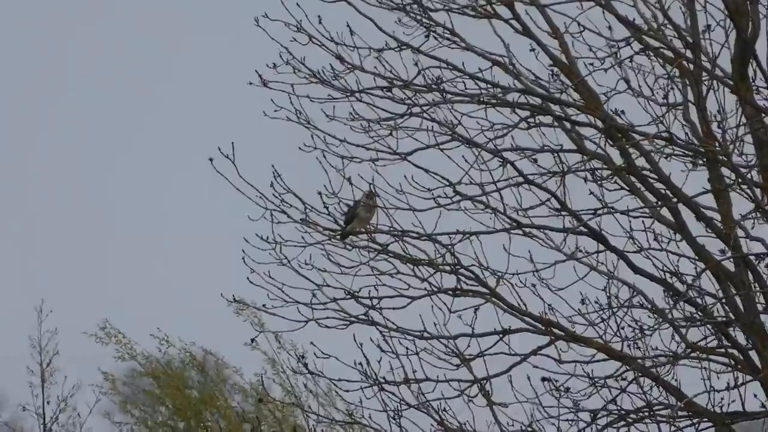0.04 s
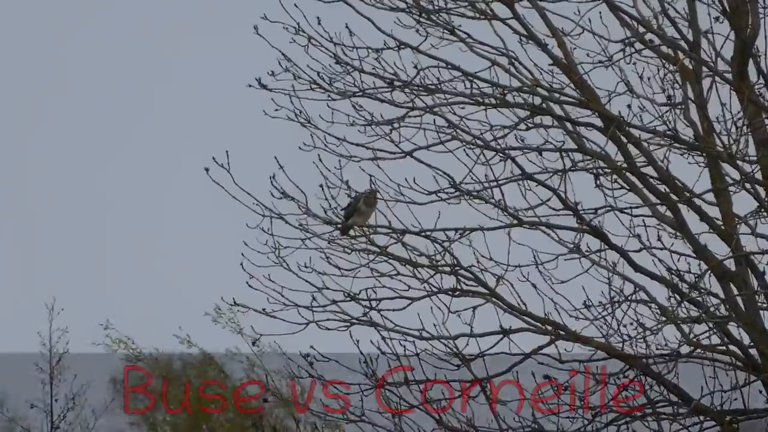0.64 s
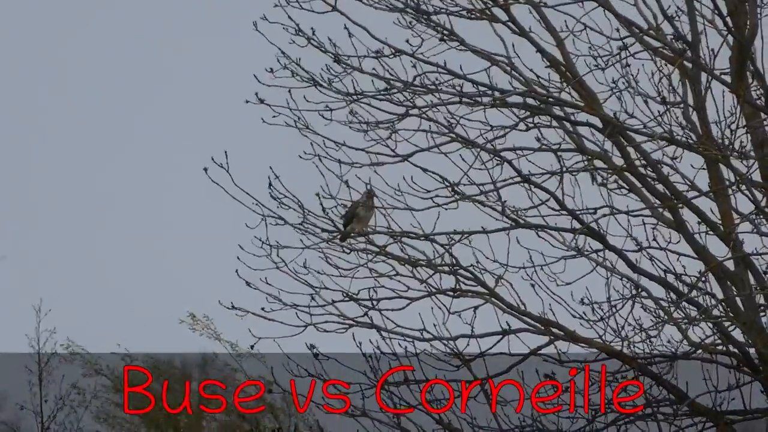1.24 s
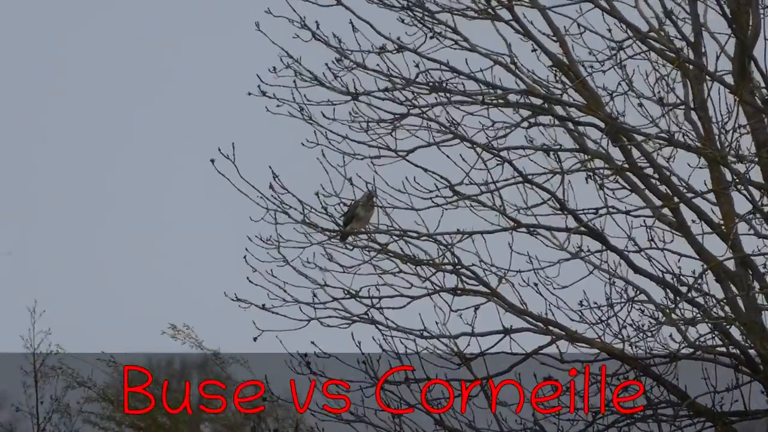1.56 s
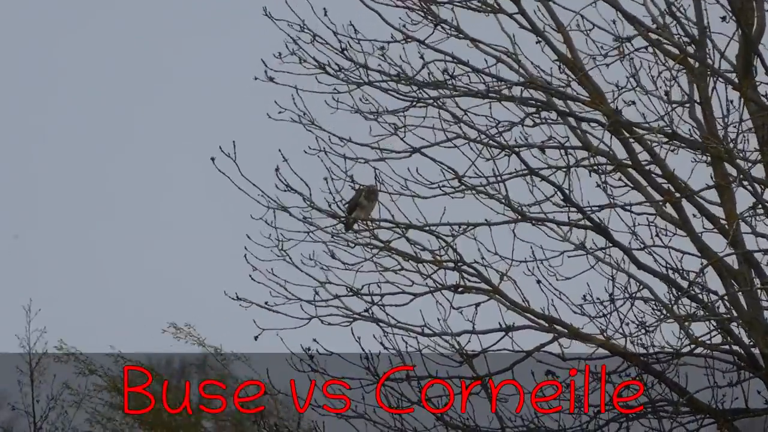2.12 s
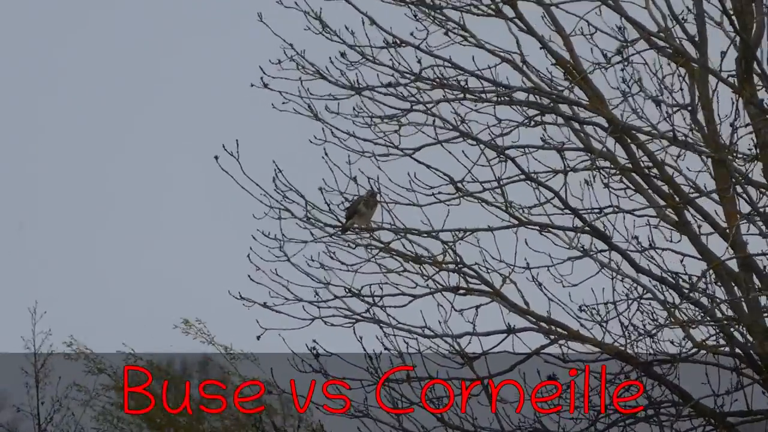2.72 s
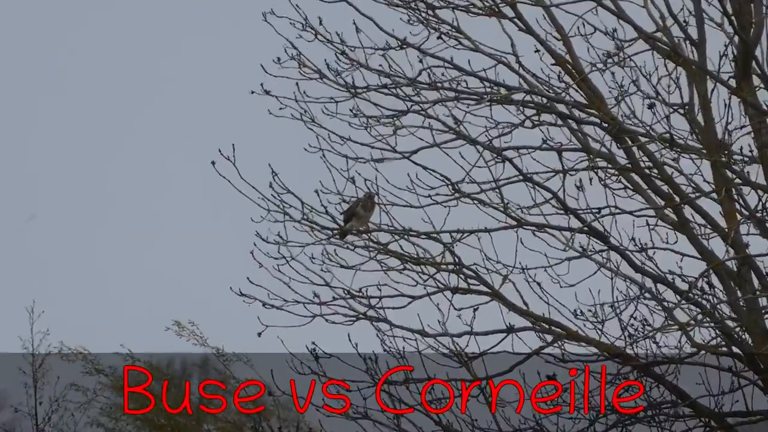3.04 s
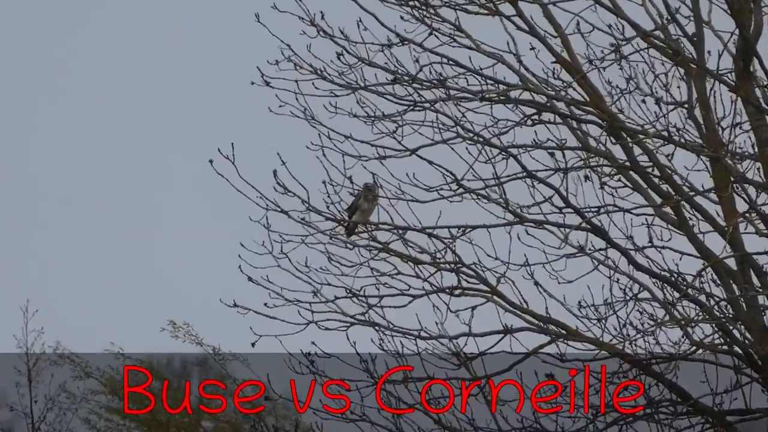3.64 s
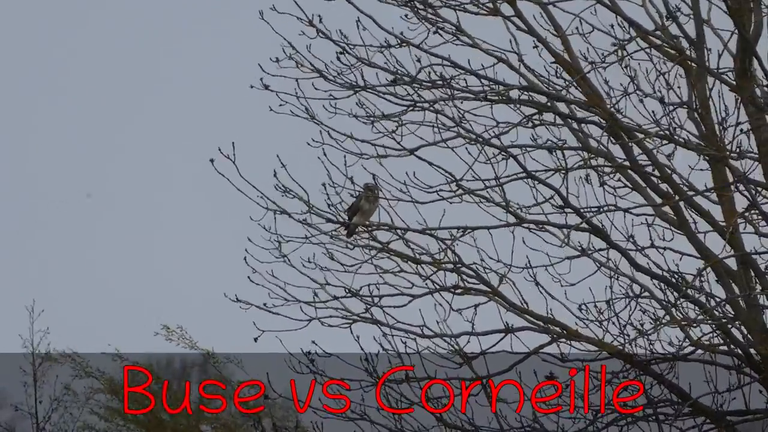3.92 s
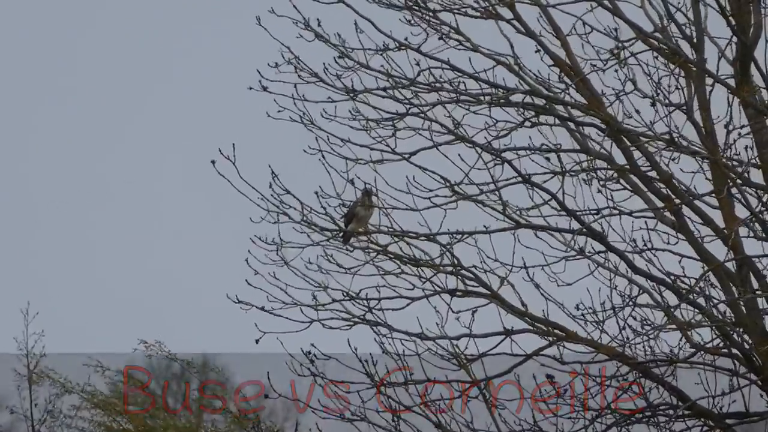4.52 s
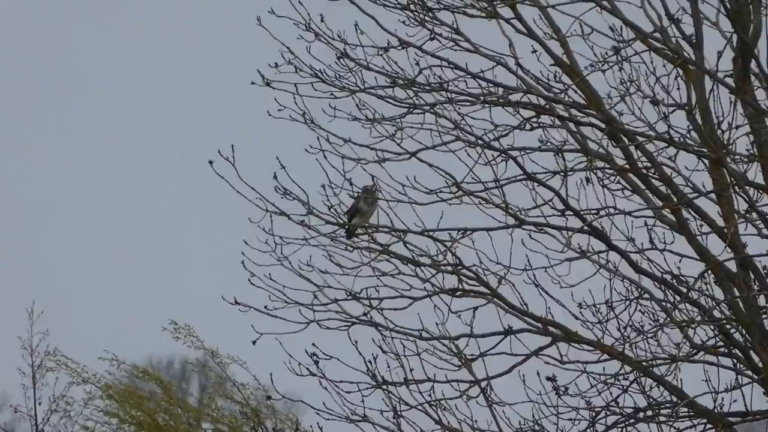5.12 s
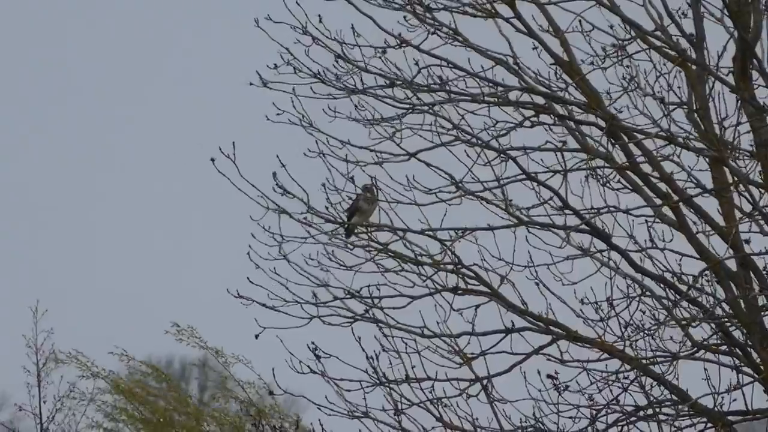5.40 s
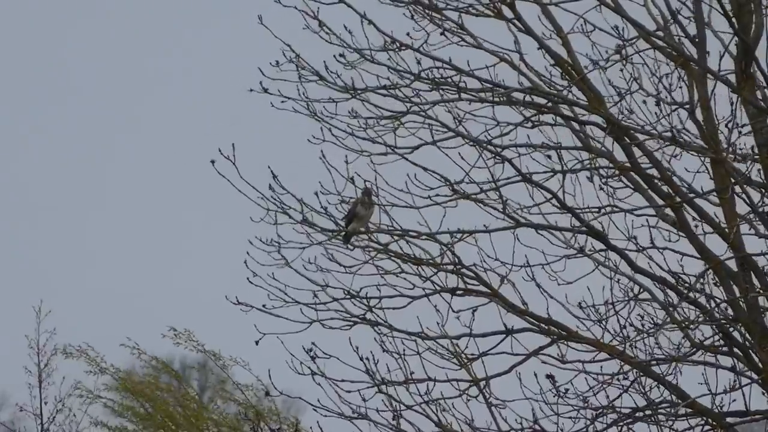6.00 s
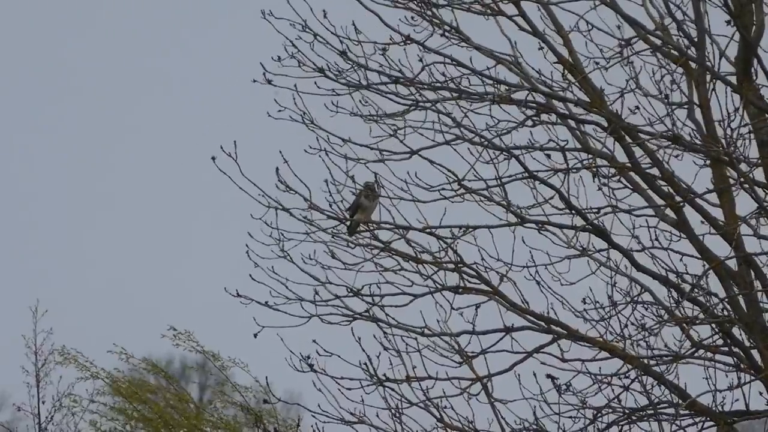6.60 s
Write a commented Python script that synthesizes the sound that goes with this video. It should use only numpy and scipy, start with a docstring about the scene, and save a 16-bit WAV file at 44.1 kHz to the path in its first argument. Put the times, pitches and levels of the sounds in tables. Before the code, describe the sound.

Outdoors among bare trees, uneven gusts rumble on the microphone over a steady rush of air, softly rustling branches and recorder hiss. Small birds chirp and scold faintly far off, mostly early on, with two faint whistles and a few light twig knocks. The wind eases after about four seconds, and near the end one bird pipes a thin, fading note. Nearly everything is on the left.

```python
"""A breezy day among bare trees. After a moment of silence, turbulent gusts rumble on the microphone over
the rush of open air, rustling branches and electronic hiss. In the first two seconds small birds chirp
and scold far off, a twig ticks and two faint whistles carry over. Scattered chirps and twig knocks follow;
after four seconds the wind eases, and near six one bird pipes a thin, fading note. Throughout, nearly
all of it reaches the left channel; the right holds little but the recorder's own hiss."""
import sys
import numpy as np
from scipy import signal
from scipy.fft import rfft, irfft
from scipy.io import wavfile
from scipy.ndimage import uniform_filter1d

SR = 44100
rng = np.random.default_rng(int(sys.argv[2]) if len(sys.argv) > 2 else 0)


def bounce(signal):
    """Save signal as a 16-bit WAV file at the path given by the first command-line argument."""
    frames = np.transpose(np.atleast_2d(signal))
    limited = np.clip(frames, -1, 1)
    pcm = np.round(limited * 32767).astype(np.int16)
    wavfile.write(sys.argv[1], SR, pcm)


N = 302526
TIME = np.arange(N) / SR
HZ = np.fft.rfftfreq(N, 1 / SR)

# All levels are relative, ahead of the layer and channel gains.
# Spectrum of turbulence at the microphone: (frequency [Hz], level [dB])
RUMBLE_SPECTRUM = [(5, -13), (15, -8), (31, 1), (48, -2.5), (70, -8), (100, -16.5), (160, -26), (300, -38),
                   (900, -62)]
# Wind strength at the microphone: (time [s], level [dB])
WIND_LEVELS = [(0.28, -32.5), (0.6, -33), (1.05, -34.5), (1.35, -42), (1.7, -34.5), (2.25, -38.5),
               (2.55, -35.5), (2.95, -41.5), (3.7, -39.5), (4.35, -47.5), (4.85, -49.5), (5.1, -45),
               (5.7, -50.0), (5.95, -45), (6.2, -52), (6.6, -44), (6.86, -48.0)]
# Single buffets above that wind: (peak time [s], level [dB])
BUFFET_PEAKS = [(0.35, -32.5), (0.44, -27), (0.86, -33), (1.18, -31.5), (1.56, -34), (1.89, -34.5),
                (2.49, -27.5), (2.8, -32.5), (3.17, -38), (3.75, -37), (3.81, -32.5), (3.94, -34),
                (4.19, -39.5)]
# Breeze over the land: (time [s], rush level [dB], rustle level [dB])
BREEZE_LEVELS = [(0.56, -49.5, -59.5), (1.4, -49.5, -61), (2.06, -50, -60.5), (2.61, -49.5, -58),
                 (4.25, -50, -59.5), (6.42, -51.5, -58.5), (6.8, -51.5, -59)]
# Spectrum of the far rush: (frequency [Hz], level [dB])
RUSH_SPECTRUM = [(20, 5), (55, -3.5), (90, 5), (125, 2), (200, 0.5), (260, -1), (340, 0.15), (550, -4),
                 (850, -5.5), (1080, -6), (1500, -10.5), (2300, -16.5), (4000, -26.5), (9000, -34)]
# Broad tones in that rush: (frequency [Hz], width [Hz], lift [dB])
DRONE_PEAKS = [(92.5, 22, 4.5), (149.8, 21, 3.5), (461, 25, 4), (672, 52, 2)]
# Spectrum of the branches' rustle: (frequency [Hz], level [dB])
RUSTLE_SPECTRUM = [(400, -9), (1500, 1.5), (2600, 1.5), (3800, 0.5), (4900, -3), (5700, -7), (7500, -11),
                   (11000, -11), (16000, -8)]
# Electronic hiss: (frequency [Hz], left level [dB], right level [dB], correlation [ratio])
HISS_SPECTRUM = [(20, -10, 4, 0), (150, -10, 1, 0), (450, 2, 1, 0), (1030, 13.5, -3, 0),
                 (2200, -19, -5.5, 0.14), (4820, 7, -4, 0.036), (7500, 2, -2, 0.28), (10000, 0.5, 0, 0.4),
                 (14300, 2, 3.5, 0.76)]
# Bird chirps: (time [s], length [s], start pitch [Hz], end pitch [Hz], arch [Hz], level [dB])
CHIRP_NOTES = [(.345, .028, 3400, 3300, 0, -62), (.615, .035, 3320, 3200, 0, -63),
               (.668, .014, 3750, 3600, 0, -59), (.826, 0.049, 4210, 4700, 318, -56.5),
               (.876, 0.028, 5000, 5100, -600, -54.5), (1.062, .014, 4440, 5250, 0, -52.5),
               (1.069, .013, 4450, 3950, 0, -59), (1.12, .045, 5800, 5450, -120, -65.5),
               (1.314, .044, 3910, 5470, 150, -54.5), (1.598, .016, 5900, 4200, 250, -58),
               (1.649, .014, 5400, 4600, 0, -58), (2.166, .018, 4000, 3650, 0, -58),
               (2.324, .03, 3880, 3670, -70, -59), (3.276, .018, 5500, 4950, 0, -60),
               (5.832, .022, 3500, 3470, 0, -61), (6.28, .045, 2860, 2800, 0, -63),
               (6.617, 0.019, 3360, 3530, 480, -54)]
# Twig impacts: (time [s], peak level [dB], band centre [Hz], width [octaves])
TWIG_TICKS = [(.405, -46.5, 3600, .4), (2.520, -38, 1500, 0.62), (2.535, -43, 1400, .65),
              (2.537, -42, 2780, 0.2), (2.737, -46, 3600, 0.46), (3.808, -47, 5550, 0.24),
              (3.997, -50, 6500, .18), (4.152, -49, 3300, 0.38), (6.603, -50, 6500, .4)]
# Far whistles: (time [s], length [s], start pitch [Hz], end pitch [Hz], arch [Hz], level [dB])
WHISTLE_NOTES = [(.42, 0.12, 684, 676, 14.2, -57.5), (1.26, 0.272, 1160, 1208, 15.6, -61)]
# Toneless bird calls: (time [s], length [s], band centre [Hz], width [octaves], level [dB])
RASP_CALLS = [(0.494, .03, 4800, .1, -59), (.675, .05, 2380, 0.21, -59), (.748, 0.034, 2660, .15, -59),
              (.872, .03, 4700, .06, -58), (1.194, .025, 4570, .1, -59), (1.383, .025, 3900, .08, -59.5)]


def gain_of(db):
    """Amplitude grows tenfold for every 20 decibels."""
    return 10 ** (np.asarray(db) / 20)


def unit_rms(x):
    """Normalisation brings a signal's mean power to one."""
    return x / np.sqrt(np.mean(x ** 2) + 1e-20)


def spectrum(points, column=1):
    """Interpolation in log frequency joins a table column into a spectrum."""
    table = np.array(points, float)
    return np.interp(np.log(HZ + 1), np.log(table[:, 0] + 1), table[:, column])


def curve(rows, column=1):
    """Interpolation in time joins a table column into an envelope."""
    table = np.array(rows, float)
    return np.interp(TIME, table[:, 0], table[:, column])


def noise(colour_db):
    """Filtered white noise takes on the filter's spectrum; rms one."""
    return unit_rms(irfft(rfft(rng.standard_normal(N)) * gain_of(colour_db), N))


def band_noise(centre_hz, octaves, size=4096):
    """Band-pass filtering confines a short noise to one bell-shaped band; rms one."""
    hz = np.fft.rfftfreq(size, 1 / SR)
    band = np.exp(-.5 * (np.log2((hz + 1) / centre_hz) / octaves) ** 2)
    return unit_rms(irfft(rfft(rng.standard_normal(size)) * band))


def patchy(x, depth_db, bins, frames):
    """Eddies modulate a sound's amplitude in patches of frequency and time."""
    spectra = signal.stft(x, nperseg=512, noverlap=384)[2]
    field = uniform_filter1d(rng.standard_normal(spectra.shape), bins, axis=0)
    field = unit_rms(uniform_filter1d(field, frames, axis=1))
    return unit_rms(signal.istft(spectra * gain_of(depth_db * field), nperseg=512, noverlap=384)[1][:N])


def add(mix, start_s, sound):
    """Superposition: a sound sums into the mix from its starting time."""
    part = mix[round(start_s * SR):][:len(sound)]
    part += sound[:len(part)]


def buffeting(buffet_s=0.026, flutter_db=1.9, flutter_s=0.044):
    """Turbulent pressure on the microphone makes a rumble whose power sums wind and single buffets."""
    eddies = noise(spectrum(RUMBLE_SPECTRUM))
    eddy_envelope = np.sqrt(uniform_filter1d(eddies ** 2, size=4500) + 1e-6)
    flutter = noise(-40 * np.log10(1 + (HZ * flutter_s) ** 2))
    power = gain_of(curve(WIND_LEVELS) + flutter_db * flutter) ** 2
    for peak_s, db in BUFFET_PEAKS:
        power += gain_of(db) ** 2 * np.exp(-((TIME - peak_s) / buffet_s) ** 2)
    return eddies / eddy_envelope * np.sqrt(power) * gain_of(-1.0)


def open_air():
    """Far wind is broadband noise; low peaks in its spectrum are heard as a faint drone."""
    drone_db = sum(db / (1 + (2 * (HZ - hz) / width) ** 2) for hz, width, db in DRONE_PEAKS)
    rush = patchy(noise(spectrum(RUSH_SPECTRUM) + drone_db), depth_db=0.55, bins=5, frames=40)
    return rush * gain_of(curve(BREEZE_LEVELS) + 2.5)


def branches():
    """Flow noise: air combing through twigs and leaves makes a soft, uneven hiss."""
    rustle = patchy(noise(spectrum(RUSTLE_SPECTRUM)), depth_db=2.0, bins=7, frames=10)
    return rustle * gain_of(curve(BREEZE_LEVELS, column=2) + 2.0)


def hiss(level_db=-56.5):
    """Electronic noise, partly correlated between the channels in the treble."""
    shared, separate = rfft(rng.standard_normal((2, N)))
    correlation = np.clip(spectrum(HISS_SPECTRUM, column=3), -1, 1)
    left = shared * gain_of(spectrum(HISS_SPECTRUM, column=1))
    right = correlation * shared + np.sqrt(1 - correlation ** 2) * separate
    right *= gain_of(spectrum(HISS_SPECTRUM, column=2))
    return gain_of(level_db) * unit_rms(irfft(np.array([left, right]), N))


def sing(hz, waver):
    """Random frequency modulation makes a sine of rms one waver about its pitch curve."""
    drift = unit_rms(uniform_filter1d(rng.standard_normal(SR), size=90))[:len(hz)]
    return np.sqrt(2) * np.sin(2 * np.pi * np.cumsum(hz * (1 + waver * drift)) / SR)


def notes(rows, waver):
    """Chirps and whistles are frequency sweeps: each arches about a straight glide, swells and fades."""
    out = np.zeros(N)
    for start_s, length_s, start_hz, end_hz, arch_hz, db in rows:
        progress = np.linspace(0, 1, int(length_s * SR))
        hz = start_hz + (end_hz - start_hz) * progress + arch_hz * (1 - (2 * progress - 1) ** 2)
        add(out, start_s, gain_of(db) * sing(hz, waver) * signal.windows.tukey(len(hz), .7))
    return out


def twitter(per_s=3, length_s=0.028, centre_hz=3700, spread_octaves=0.247, fall=.05, db=-66.5):
    """Farther birds form a random process: faint falling notes at chance times and pitches."""
    draws = rng.random((round(per_s * N / SR), 2))
    times = draws[:, 0] * N / SR
    pitches = centre_hz * 2 ** (spread_octaves * (2 * draws[:, 1] - 1))
    rows = [(s, length_s, hz, hz * (1 - fall), 0, db) for s, hz in zip(times, pitches)]
    return notes(rows, waver=.01)


def twigs(rise_s=0.00061, decay_s=0.0051):
    """Damped impacts: twigs knock together, each a burst of band noise that decays exponentially."""
    out = np.zeros(N)
    for start_s, db, centre_hz, octaves in TWIG_TICKS:
        burst = band_noise(centre_hz, octaves)
        t = TIME[:len(burst)]
        burst = burst * (1 - np.exp(-t / rise_s)) * np.exp(-t / decay_s)
        add(out, start_s, gain_of(db) * burst / abs(burst).max())
    return out


def whistles():
    """Two distant whistles are nearly pure tones with a slow, shallow glide."""
    return notes(WHISTLE_NOTES, waver=0.013)


def rasps():
    """Scolding calls are aperiodic: brief swells of narrow-band noise."""
    out = np.zeros(N)
    for start_s, length_s, centre_hz, octaves, db in RASP_CALLS:
        call = band_noise(centre_hz, octaves)[:int(length_s * SR)]
        add(out, start_s, gain_of(db) * unit_rms(call) * signal.windows.tukey(len(call), .7))
    return out


def piping(start_s=6.098, length_s=.2, pitch_hz=4155, db=-54.5):
    """A bird's thin tone scoops up to a held pitch while its amplitude decays exponentially."""
    scoop_hz, scoop_s, rise_s, fade_db_per_s = 450, .008, 0.017, 73
    t = TIME[:int(length_s * SR)]
    tone = sing(pitch_hz - scoop_hz * np.exp(-t / scoop_s), waver=0.0033)
    envelope = np.minimum(t / rise_s, 1) * gain_of(db - fade_db_per_s * t)
    out = np.zeros(N)
    add(out, start_s, tone * envelope)
    return out


def among_trees(x, wet_db, t60_s, echoes_per_s=2000):
    """Scattering from trunks and branches leaves a thin reverberant tail after each sound."""
    t = TIME[:SR]
    echoes = rng.standard_normal(SR) * (rng.random(SR) < echoes_per_s / SR)
    tail = echoes * gain_of(-60 * t / t60_s) * (t > .008)
    return x + gain_of(wet_db) * signal.fftconvolve(x, tail / np.linalg.norm(tail))[:N]


def scene():
    """The sources superpose at one microphone, which feeds the left channel and leaks into the right."""
    calls = notes(CHIRP_NOTES, waver=0.013) + twitter() + piping() + rasps()
    birds = among_trees(calls, wet_db=-8.5, t60_s=0.2)
    far_whistles = among_trees(whistles(), wet_db=-3, t60_s=0.83)
    knocks = among_trees(twigs(), wet_db=-5.0, t60_s=0.6)
    outdoors = buffeting() + open_air() + branches() + birds + far_whistles + knocks
    left_db, right_db = 6.0, -35.0
    return np.array([gain_of(left_db) * outdoors, gain_of(right_db) * outdoors])


def record(dry):
    """Noise and filtering: the recorder adds hiss, cuts a notch, switches on and limits the band."""
    notch_hz, notch_width_hz, switch_on_s, cutoff_hz = 5928, 130, .2735, 15770
    b, a = signal.iirnotch(notch_hz, notch_hz / notch_width_hz, SR)
    live = signal.lfilter(b, a, dry + hiss()) * (TIME >= switch_on_s)
    low_pass = signal.firwin(511, cutoff_hz, window=("kaiser", 9), fs=SR)
    return signal.oaconvolve(live, low_pass[None], "same")


dry = scene()
out = record(dry)
bounce(out)
```